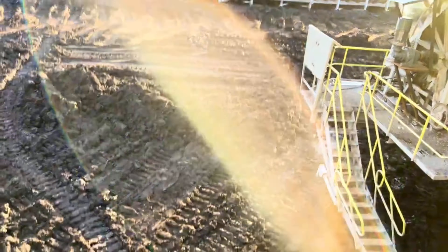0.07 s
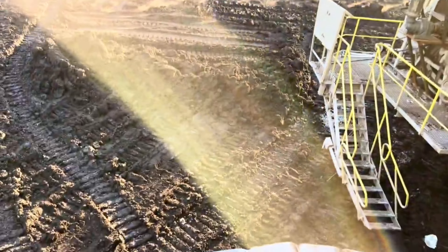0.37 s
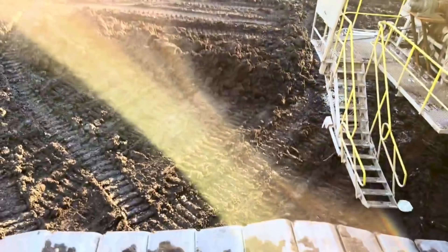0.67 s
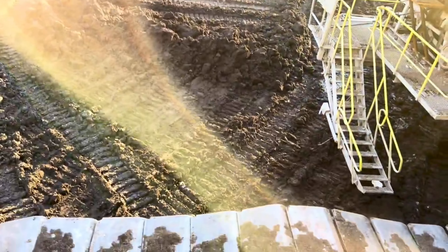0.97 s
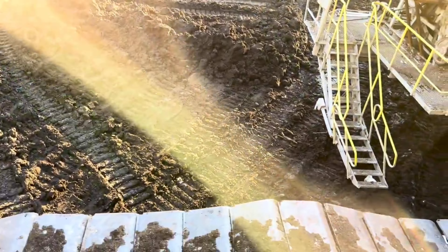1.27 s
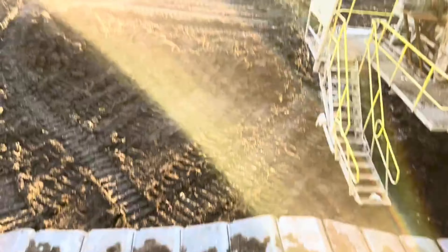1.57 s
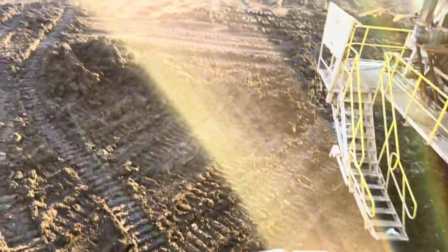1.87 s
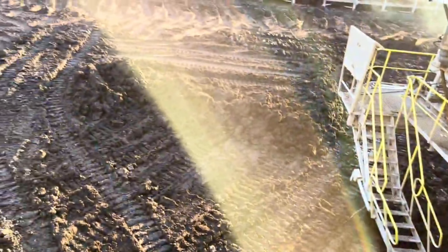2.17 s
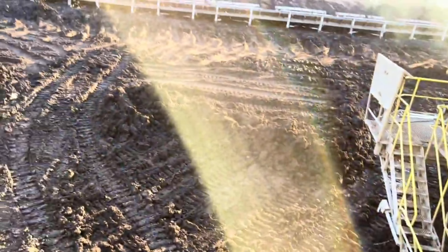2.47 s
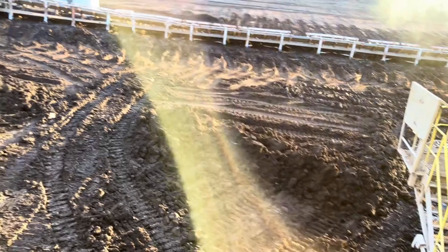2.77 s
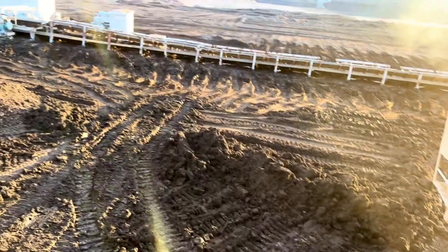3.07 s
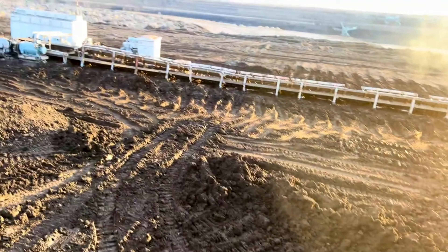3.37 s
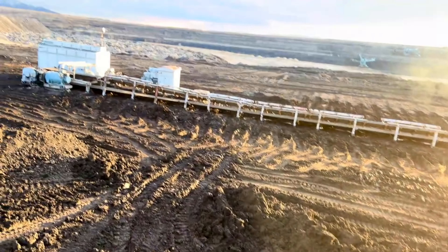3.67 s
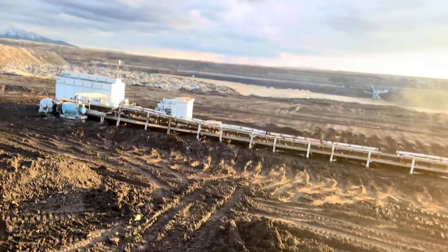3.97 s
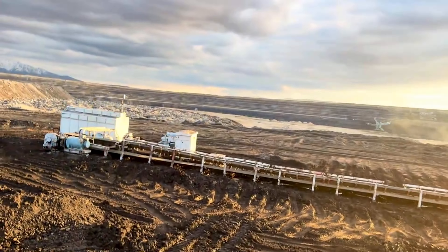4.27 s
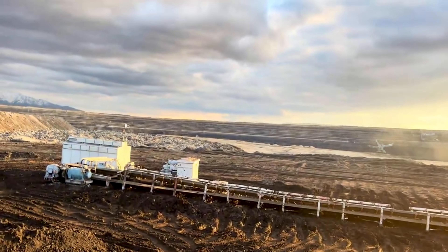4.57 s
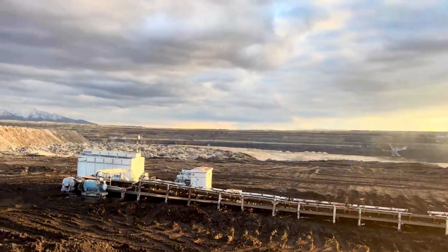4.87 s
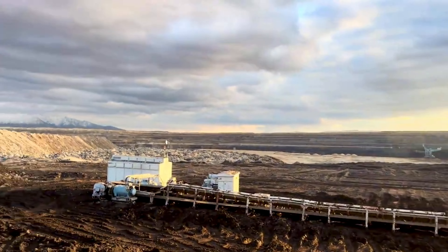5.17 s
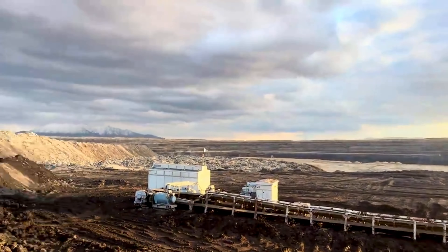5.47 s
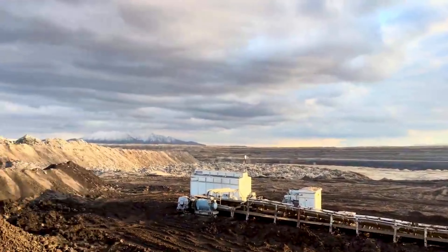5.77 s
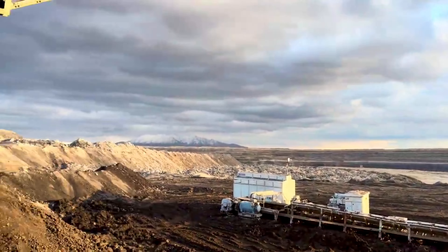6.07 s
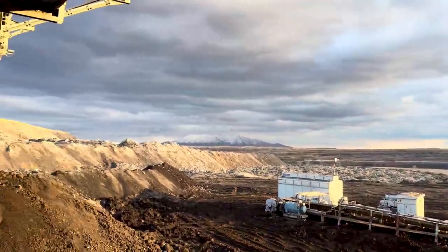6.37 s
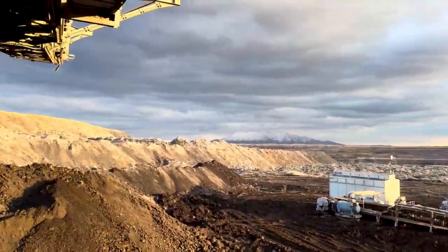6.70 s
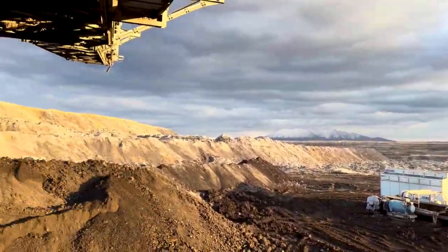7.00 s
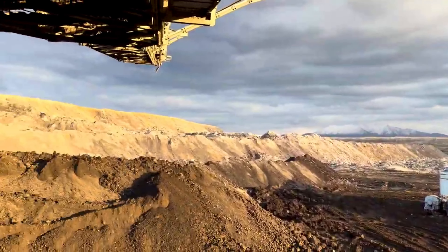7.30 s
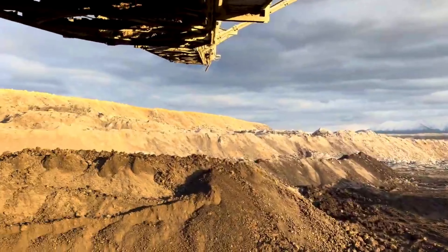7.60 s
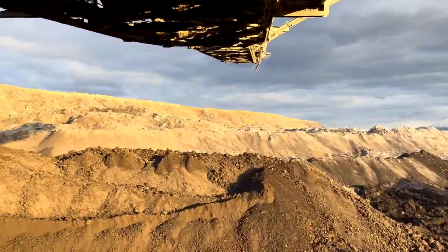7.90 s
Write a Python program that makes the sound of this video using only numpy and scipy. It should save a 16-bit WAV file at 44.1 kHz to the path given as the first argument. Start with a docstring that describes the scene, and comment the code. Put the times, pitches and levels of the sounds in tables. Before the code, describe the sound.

Dry conveyor rollers give small, high chirps outdoors while a bulldozer's chugging diesel climbs in pitch and its tracks knock and clank several times. The engine settles into a steady, clattering drone with an airy turbo whistle, above low track grinding and occasional thuds. The microphone turns slowly across the pit, and soil hissing off a conveyor belt swells towards the end, with a few more short squeals.

```python
"""A bulldozer's six-cylinder diesel revs up in an open pit while dry conveyor rollers chirp and squeal.
Within a second its turbocharger starts whistling up with it; the tracks rumble and knock, the hull booms.
From about 3.4 s the engine drones at full speed under load and the tracks grind harder.
Meanwhile the microphone turns slowly, through the beam of the intake near 5 s,
towards a hiss of running belts and sliding soil that is loudest at the end."""
import sys
import numpy as np
from scipy.fft import rfft, irfft, next_fast_len
from scipy.io import wavfile
from scipy.ndimage import uniform_filter1d, map_coordinates

SR = 44100
rng = np.random.default_rng(int(sys.argv[2]) if len(sys.argv) > 2 else 0)


def output_pcm(signal):
    """Save a mono or channel-first signal as 16-bit PCM at the path in sys.argv[1].

    Samples are clipped to [-1, 1] before scaling.
    """
    pcm = np.clip(np.atleast_2d(signal).T, -1, 1) * 32767
    wavfile.write(sys.argv[1], SR, np.round(pcm).astype(np.int16))


N = 354652
T = np.arange(N) / SR
ENGINE_LEAD_MS = 0.26  # the bulldozer reaches the right ear first
# the six firings of one engine cycle: (strength [ratio])
CYLINDERS = [0.62, 0.56, 1, 0.34, .4, 0.26]


def amp(db):
    """Decibels to gain."""
    return 10 ** (np.asarray(db) / 20)


def unit(x):
    """Scale to rms 1."""
    return x / np.sqrt(np.mean(x ** 2) + 1e-20)


def along(points, hz):
    """Read (frequency, value) points on a log axis."""
    f, v = np.transpose(points)
    return np.interp(np.log(hz + 1), np.log(f + 1), v)


def curve(points):
    """Join (time, value) points into one value a sample."""
    return np.interp(T, *np.transpose(points))


def between(ends, share):
    """From the first value to the second as share goes from 0 to 1."""
    return ends[0] + share * (ends[1] - ends[0])


def swell(middle_s, half_s):
    """A smooth rise to 1 and fall."""
    return np.exp(-((T - middle_s) / half_s) ** 2 / 2)


def held(middle_s, half_s):
    """A quick rise to 1, a hold and a quick fall."""
    return np.exp(-((T - middle_s) / half_s) ** 4 / 2)


def wobble(rate):
    """A smooth random curve, rate knots a second."""
    return map_coordinates(rng.standard_normal(int(N * rate / SR) + 4), [T * rate])


def turns(hz):
    """Cycles gone by at a moving frequency."""
    return np.cumsum(hz * np.ones(N)) / SR


def filtered(x, response):
    """Filter x with a gain that depends on frequency."""
    size = next_fast_len(N + 8192)
    return irfft(rfft(x, size) * response(np.fft.rfftfreq(size, 1 / SR)), size)[..., :N]


def coloured(x, spectrum):
    """Equalise x along (frequency [Hz], gain [dB]) points."""
    return filtered(x, lambda hz: amp(along(spectrum, hz)))


def placed(x, lead_ms):
    """A source off to the right reaches that ear earlier."""
    lead = lead_ms * SR / 1000
    return np.array([map_coordinates(x, [np.arange(N) + side * lead], order=3, mode="mirror")
                     for side in (-.5, .5)])


def diffuse(spectrum, channels=2):
    """Coloured noise of rms 1, unrelated between channels."""
    return unit(coloured(rng.standard_normal((channels, N)), spectrum))


def noise(spectrum):
    """Stereo noise: a direct part from the bulldozer's side, and scatter from all round."""
    # sound that arrives directly: (frequency [Hz], share of power [ratio])
    direct_share = [(60, 0.88), (130, 0.68), (280, 0.89), (600, 0.48), (1400, 0.51), (3000, 0.23),
                    (7000, 0.031), (11000, 0.18)]
    direct, *scatter = diffuse(spectrum, channels=3)
    direct = filtered(direct, lambda hz: np.sqrt(along(direct_share, hz)))
    scatter = filtered(np.array(scatter), lambda hz: np.sqrt(1 - along(direct_share, hz)))
    return placed(direct, ENGINE_LEAD_MS) + scatter


def fuzzy(hz, width_hz):
    """A tone of rms 1 whose strength and phase drift, smearing it into a narrow band."""
    a, b = filtered(rng.standard_normal((2, N)), lambda f: 1 / (1 + (2 * f / width_hz) ** 2))
    phase = 2 * np.pi * turns(hz)
    return unit(a * np.cos(phase) + b * np.sin(phase))


def ringing(modes, age):
    """Damped modes, a little different at every blow."""
    return sum(amp(db + rng.normal(0, 3.54) - 60 * age / t60)
               * np.sin(2 * np.pi * (hz * age + rng.random())) for hz, db, t60 in modes)


def belt():
    """Soil hisses unevenly off the belt; as the microphone turns, the hiss shifts and swishes rise."""
    # colour of the hiss, with a treble gap near 8 kHz that is not the soil's own:
    # (frequency [Hz], level [dB])
    hiss_colour = [(40, -90), (400, -9), (900, 11.5), (1500, 9), (2400, 1), (3200, 3.5), (4200, -2),
                   (5200, 2), (6500, -5), (8000, -19), (9200, -2), (10500, -32), (12000, -68)]
    # build of the hiss: (time [s], level [dB])
    hiss_level = [(0, -54), (3, -46.5), (5.3, -47.5), (6, -43.5), (7.3, -43), (7.75, -35.5), (8.04, -38.5)]
    # its head start at the right ear: (time [s], lead [ms])
    hiss_lead = [(5.5, .48), (6.5, .46), (7.2, .44), (8.04, .385)]
    # swishes: (middle [s], half length [s], pitch [Hz], rise [octaves/s], width [Hz], level [dB])
    swishes = [(5.5, .45, 3900, .21, 400, -51), (5.45, .4, 4600, .22, 420, -52),
               (6.3, .3, 3600, .25, 550, -56), (6.3, .35, 6300, .1, 700, -59),
               (6.45, .15, 1950, .4, 400, -54), (7, .25, 2450, .45, 420, -49.5),
               (7, .33, 4250, .35, 440, -50.5), (7.3, .2, 6750, .2, 700, -55),
               (7.77, .22, 5050, .24, 750, -50)]
    flow_db = 0.93 * wobble(11) + 1.6 * wobble(30)  # surges and lumps
    direct, *scatter = diffuse(hiss_colour, channels=3)
    hiss = amp(curve(hiss_level)) * unit(placed(direct, curve(hiss_lead)) + amp(-4.5) * np.array(scatter))
    swish = np.zeros((2, N))
    for s, half, hz, rise, width_hz, db in swishes:
        centre_hz = hz * 2 ** (rise * (T - s))
        swish += amp(db) * swell(s, half) * np.array([fuzzy(centre_hz, width_hz) for ear in range(2)])
    scrape = amp(.7 * wobble(35))
    return amp(flow_db) * (hiss + swish * scrape)


def roller(turn):
    """A dry roller chatters and chirps on two close modes; its rubbing fades as the microphone turns."""
    # roller resonances: (pitch [Hz], width [Hz], level [dB])
    modes = [(2760, 46, 8), (2822, 44, 6.5)]
    # chirps that leap out of the chatter: (time [s], level [dB])
    chirps = [(.11, -48), (.262, -49), (.31, -47), (.41, -46), (.64, -50), (.68, -50), (.95, -47),
              (1.068, -40), (1.16, -57), (1.62, -48), (1.84, -48), (1.91, -46), (2.048, -43), (2.305, -53),
              (2.56, -44), (2.74, -45), (2.833, -42.5), (2.916, -50), (3.16, -48), (3.3, -43.5),
              (3.46, -44), (3.57, -44), (3.74, -48), (3.96, -45), (4.115, -50), (4.34, -46), (4.6, -45.5),
              (4.767, -48)]
    rub = amp(-53 - 4 * turn + 5 * np.tanh(wobble(34)))
    chatter = [sum(amp(db) * fuzzy(hz, width) for hz, width, db in modes) for ear in range(2)]
    ring = [sum(amp(db) * np.sin(2 * np.pi * turns(hz + width / 2 * wobble(60)))
                for hz, width, db in modes) for ear in range(2)]
    chirp_level = sum(amp(db) * swell(s, half_s=0.017) for s, db in chirps)
    return rub * unit(np.array(chatter)) + chirp_level * unit(np.array(ring))


def squeals():
    """Short squeals near 3.5 kHz and a faint thin whistle near 7.3 kHz tremble in pitch and level."""
    # squeals and whistle: (middle [s], half length [s], pitch [Hz], level [dB], relative octave [dB])
    notes = [(.32, .016, 3490, -50, -6), (1, .18, 7270, -68, -30), (1.617, .031, 3490, -45, -11),
             (1.772, .02, 3497, -43, -19), (1.875, .068, 3505, -48.5, -5.5), (2.03, .024, 3487, -44, -14),
             (2.157, .014, 3470, -51, -18), (2.3, .4, 7320, -68, -30), (6.022, .011, 3485, -47, -19),
             (6.087, .027, 3485, -39, -20), (6.15, .022, 3485, -46, -19), (6.803, .025, 3490, -43.5, -12),
             (7.478, .027, 3520, -44, -24), (7.555, .033, 3495, -42, -18)]
    waver_hz, rough_db = 8, 3
    waver = turns(waver_hz * wobble(260))
    tones = np.zeros(N)
    for s, half, hz, db, octave_db in notes:
        phase = 2 * np.pi * (hz * T + waver)
        tones += amp(db) * swell(s, half) * (np.sin(phase) + amp(octave_db) * np.sin(2 * phase))
    pan_right = amp([[-2.5], [.5]])
    return tones * amp(rough_db * wobble(78)) * pan_right


def tracks(speed):
    """Links rumble over soft ground and grind harder as the engine speeds up."""
    # dull rumble of the links: (frequency [Hz], level [dB])
    rumble_colour = [(20, -87), (90, -43), (180, -1.5), (270, -1), (380, -3.5), (450, -13), (600, -24),
                     (1200, -61), (6000, -120)]
    # their midrange grind: (frequency [Hz], level [dB])
    grind_colour = [(60, -89), (300, -8), (480, 2), (560, 4), (700, -14.5), (1000, -48), (5000, -120)]
    rumble = amp(between((-33.5, -35.5), speed) + 0.17 * wobble(7.7)) * noise(rumble_colour)
    grind = amp(between((-55, -41.5), speed) + 1.2 * wobble(13)) * noise(grind_colour)
    return rumble + grind


def clacks():
    """Track pins snap against their links."""
    # small steel snaps: (time [s], level [dB])
    snaps = [(2.023, -34.5), (2.109, -34), (2.181, -33)]
    # colour of a pin: (frequency [Hz], level [dB])
    pin_colour = [(300, -50), (900, -4), (1350, 5), (1650, -5), (2100, -8), (2800, -22), (6000, -52)]
    attack_s, t60_s = 0.0017, 0.11
    level = np.zeros(N)
    for s, db in snaps:
        age = np.maximum(T - s, 0)
        level += (1 - np.exp(-age / attack_s)) * amp(db - 60 * age / t60_s)
    return level * diffuse(pin_colour)


def booms():
    """The heavy hull booms briefly as it rocks over the ground."""
    # deep hull notes: (time [s], pitch [Hz], level [dB])
    notes = [(1.565, 55.8, -18), (2.22, 51.6, -16), (3.605, 118, -19), (5.39, 71.8, -14), (6.66, 69.5, -23),
             (7.43, 62, -19), (7.97, 60.5, -20)]
    hull = sum(amp(db) * swell(s, half_s=0.029) * np.sin(2 * np.pi * (hz * T + rng.random()))
               for s, hz, db in notes)
    return placed(hull, ENGINE_LEAD_MS)


def knocks():
    """A link drops: the frame and the shoe ring, the ground thuds and loose parts rattle."""
    # link drops: (time [s], attack [s], thud [dB], body [dB], clank [dB])
    drops = [(.035, 0.017, -50, -47, -34), (.24, 0.011, -52, -35, -33.5), (.528, 0.0056, -30, -35, -53),
             (1.497, 0.0048, -21, -9, -33), (1.732, 0.0062, -17.5, -15, -46), (2.02, 0.0044, -25, -18, -39),
             (2.111, 0.0039, -22, -15, -22.5), (2.182, 0.0043, -29, -18.5, -30.5),
             (2.494, 0.0021, -18, -26, -52), (4.288, 0.0027, -11, -22, -54), (5.35, 0.0077, -10, -9.5, -38),
             (5.385, 0.008, -25, -27, -40), (5.429, 0.0044, -14, -20, -35), (7.35, 0.0091, -22, -9.5, -39),
             (7.425, 0.0046, -21, -33, -46), (7.944, 0.0038, -9.5, -40, -52)]
    # ring of the steel frame: (pitch [Hz], level [dB], t60 [s])
    frame_modes = [(65, -5, 0.49), (108, 0, 0.2), (256.3, -1, 0.13), (297, -11.5, 0.36), (473, -12, 0.18),
                   (595, -15.5, 0.17), (747, -18, 0.14)]
    # ring of a track shoe: (pitch [Hz], level [dB], t60 [s])
    shoe_modes = [(634, -6.5, 0.41), (880, -6.5, 0.22), (1190, -15, 0.11)]
    # thud of the ground: (frequency [Hz], level [dB])
    thud_colour = [(20, -50), (60, 9), (110, 34.5), (170, 26.5), (300, -37), (1500, -120)]
    # low rattle of the body: (frequency [Hz], level [dB])
    body_colour = [(20, -90), (100, -11), (200, 0.5), (275, 1.5), (400, -3.5), (520, -6), (700, -18),
                   (1200, -29), (5000, -120)]
    # clank of loose parts: (frequency [Hz], level [dB])
    clank_colour = [(40, -120), (400, -14), (680, 12), (1000, 1), (1800, -12), (2800, -40), (7000, -57),
                    (14000, -120)]
    thud_t60_s, body_t60_s, clank_t60_s = 0.14, 0.29, 0.15
    ring, thud, body, clank = np.zeros((4, N))
    for s, attack_s, thud_db, body_db, clank_db in drops:
        near = (T > s) & (T < s + .5)
        age = T[near] - s
        blow = (1 - np.exp(-age / attack_s)) ** 2
        thud[near] += blow * amp(thud_db - 60 * age / thud_t60_s)
        body[near] += blow * amp(body_db - 60 * age / body_t60_s)
        clank[near] += blow * amp(clank_db - 60 * age / clank_t60_s)
        ring[near] += blow * amp(body_db - 3.5) * ringing(frame_modes, age)
        ring[near] += blow * amp(clank_db) * ringing(shoe_modes, age)
    rattle = amp(-6.5) * body * noise(body_colour) + clank * noise(clank_colour)
    return placed(ring, ENGINE_LEAD_MS) + thud * noise(thud_colour) + rattle


def whine(hz, clean_db, width_hz):
    """Meshing gears: a clean tone from the engine with a rough part scattered round it."""
    clean = placed(np.sin(2 * np.pi * turns(hz)), ENGINE_LEAD_MS)
    rough = np.array([fuzzy(hz, width_hz) for ear in range(2)])
    return unit(amp(clean_db) * clean + rough)


def gears(firing_hz, speed):
    """The timing gears whine up with the engine, and their casing rings in swells."""
    # casing resonances: (middle [s], half length [s], pitch [Hz], level [dB], clean over rough [dB])
    resonances = [(0.29, .07, 975, -43.5, -4), (.64, .1, 1072, -46, -5), (1.14, .2, 1112, -46.5, -5),
                  (1.73, .14, 1224, -41.5, -3), (7.18, .48, 1620, -42.5, 5)]
    mesh = amp(between((-53, -56.5), speed)) * whine(18.25 * firing_hz, clean_db=-13, width_hz=28)
    casing = sum(amp(db) * held(s, half) * whine(hz, clean_db, width_hz=22)
                 for s, half, hz, db, clean_db in resonances)
    return mesh + casing


def turbocharger(firing_hz, speed, beam):
    """The turbocharger spools up into a breathy whistle whose pitch follows the engine."""
    on_s, spool_s = 0.78, 0.27
    spool = (1 + np.tanh((T - on_s) / spool_s)) / 2
    level_db = between((-68, -59.5), speed) + 6.5 * beam + 1.5 * wobble(8.3)
    return spool * amp(level_db) * fuzzy(146.2 * firing_hz, width_hz=540)


def throb(firing_hz, depth):
    """One swell per firing, each cylinder at its own strength."""
    firings = turns(firing_hz)
    strength = np.asarray(CYLINDERS)[firings.astype(int) % len(CYLINDERS)]
    return unit(1 + depth * strength * np.sin(np.pi * firings) ** 2)


def intake(firing_hz, speed, beam):
    """Air rushes into the engine, pulsing with the cylinders."""
    # bright rush, with a treble gap near 8.5 kHz that is not the air's own: (frequency [Hz], level [dB])
    rush_colour = [(200, -84), (2000, -7), (5000, -6.5), (7000, 13.5), (8500, -8), (10000, 10.5),
                   (12500, 8), (13600, 7.5), (14500, -5)]
    level_db = between((-64, -55), speed) + 1.5 * beam + 1.8 * wobble(7.1)
    return amp(level_db) * noise(rush_colour) * throb(firing_hz, depth=0.66)


def combustion(firing_hz, speed, turn):
    """Combustion clatters at each firing, louder with speed and as the microphone turns."""
    # hard diesel clatter: (frequency [Hz], level [dB])
    clatter_colour = [(40, -98), (350, -3), (650, -1), (830, 4.5), (930, -1), (1100, 3), (1500, -6),
                      (2200, -8.5), (3200, -14), (4600, -14.5), (5800, -22.5), (7500, -49), (14000, -78)]
    level_db = between((-44.5, -40), speed) + 4.5 * turn + 1.06 * wobble(12)
    return amp(level_db) * noise(clatter_colour) * throb(firing_hz, depth=0.43)


def growl(cycles, count=110, size=4096):
    """The ragged pressure wave of one engine cycle repeats; the body colours its many overtones."""
    # body colour: (frequency [Hz], level per overtone [dB])
    overtone_colour = [(180, -46.5), (240, -48), (330, -50.5), (420, -54), (560, -53), (700, -66.5),
                       (830, -63.5), (1100, -79), (1400, -77)]
    strengths = (np.arange(count) > 12) * amp(2.5 * rng.standard_normal(count))
    phases = np.exp(2j * np.pi * rng.random(count))
    wave = irfft(strengths * phases, size) * size / np.sqrt(2)
    return coloured(np.interp(cycles % 1 * size, np.arange(size), wave), overtone_colour)


def chug(firing_hz, speed):
    """The firing tone, its octave, and tones of the uneven cylinders that crest together in a chug."""
    # firing tone: (time [s], level [dB])
    tone_level = [(0, -20.5), (.28, -17.5), (.44, -22.5), (.52, -16), (.62, -26), (.7, -17), (1.1, -20),
                  (1.48, -19), (1.7, -32.5), (2, -18), (2.3, -20), (2.6, -15), (3.05, -23), (3.35, -20),
                  (3.9, -22), (5, -27.5), (5.65, -23), (7.1, -30.5), (8.04, -31)]
    # its octave, booming in the exhaust pipe: (time [s], level [dB])
    octave_level = [(0.1, -28), (.4, -50), (1.25, -43), (1.5, -29), (1.8, -31), (2.05, -54), (2.4, -39),
                    (2.9, -26), (3.3, -35.5), (3.7, -49), (5.1, -47), (5.4, -45), (8.04, -36)]
    # uneven-cylinder tones: (order [x cycle rate], level when slow [dB], level at full speed [dB])
    orders = [(3, -42, -35), (4, -36.5, -31), (5, -34, -42), (7, -38, -41), (8, -38, -42), (9, -35.5, -32),
              (10, -35, -46), (11, -40, -46), (13, -44, -45.5), (14, -46, -45), (16, -50, -47),
              (18, -51, -47.5), (20, -50, -51), (22, -44, -48.5), (24, -46, -50.5), (26, -43.5, -54),
              (37, -60, -55)]
    # higher tones that swell a while: (middle [s], half length [s], order [x cycle rate], level [dB])
    drones = [(4.75, .45, 22, -43), (5.15, .45, 24, -44), (5.95, .3, 22, -46)]
    smear_s = between((.005, .0009), speed)  # the crests line up more tightly at speed
    firings = turns(firing_hz)
    cycles = firings / len(CYLINDERS)
    tones = amp(curve(tone_level) + .8 * wobble(8.3)) * unit(np.cos(2 * np.pi * firings))
    tones += amp(curve(octave_level) + 0.51 * wobble(2.1)) * unit(np.sin(2 * np.pi * 2 * firings))
    for order, *ends_db in orders:
        level_db = between(ends_db, speed) + 1.9 * wobble(8)
        late_cycles = rng.normal() * smear_s * firing_hz / len(CYLINDERS)
        tones += amp(level_db) * unit(np.cos(2 * np.pi * order * (cycles - late_cycles)))
    for s, half, order, db in drones:
        tones += amp(db) * held(s, half) * unit(np.sin(2 * np.pi * order * cycles))
    return placed(tones, ENGINE_LEAD_MS)


def exhaust(firing_hz, speed):
    """The exhaust rasps and puffs out gas, both harder while the engine accelerates."""
    # deep puffs of gas: (frequency [Hz], level [dB])
    puff_colour = [(15, -52), (30, -6), (42, -4), (60, 0), (110, 0.5), (160, -9), (230, -9.5), (400, -75),
                   (1500, -120)]
    cycles = turns(firing_hz) / len(CYLINDERS)
    acceleration = uniform_filter1d(np.gradient(firing_hz) * SR, size=SR // 4)  # Hz a second
    rasp = np.array([growl(cycles + .003 * wobble(14)) for ear in range(2)])
    rasp *= amp(between((-15, 1), speed) + 0.144 * acceleration)
    puffs_db = between((-37.5, -28), speed) + 0.3826 * acceleration + 2.0 * wobble(6.3)
    puffs = amp(puffs_db) * noise(puff_colour) * throb(firing_hz, depth=0.58)
    return rasp + puffs


def scene():
    """The bulldozer works in front of the conveyor while the microphone turns."""
    # the engine revving up: (time [s], firing rate [Hz])
    revs = [(0, 51), (.45, 57.3), (.8, 59.8), (1, 60.8), (1.3, 61.2), (1.5, 64.2), (1.72, 68.4),
            (2.5, 77.9), (3, 85.7), (3.4, 89.3), (6.5, 89.1), (7.3, 88.2), (8.04, 89.5)]
    firing_hz = curve(revs)
    speed = (firing_hz - firing_hz.min()) / np.ptp(firing_hz)  # 0 slow, 1 full
    turn = np.interp(T, [2.63, T[-1]], [0, 1])  # the microphone turns at an even pace
    beam = swell(middle_s=5.1, half_s=0.99)  # it passes through the beam of the intake
    engine = chug(firing_hz, speed) + exhaust(firing_hz, speed) + combustion(firing_hz, speed, turn)
    engine += intake(firing_hz, speed, beam) + gears(firing_hz, speed)
    engine += turbocharger(firing_hz, speed, beam)
    undercarriage = tracks(speed) + knocks() + booms() + clacks()
    background = roller(turn) + squeals() + belt()
    return background + undercarriage + engine


def record(dry):
    """The microphone pair widens the midrange, favours the left and cuts the deepest bass and the top."""
    # stereo width: (frequency [Hz], side gain [dB])
    width = [(60, 1), (250, -2.5), (500, 2.5), (1000, 2), (2000, 0), (8000, -1)]
    # balance: (frequency [Hz], left minus right [dB])
    tilt = [(60, 1), (110, 2), (200, 4), (370, 2), (680, 1.5), (1240, 0.5), (2270, -0.5), (4150, 5),
            (7600, -1.5), (13900, 0.0)]
    fade_s, low_hz, top_hz = .006, 29.5, 14300
    left, right = dry * np.minimum(1, np.minimum(T, T[-1] - T) / fade_s)
    mid = (left + right) / 2
    side = coloured((left - right) / 2, width)
    pair = np.array([mid + side, mid - side])
    pair = filtered(pair, lambda hz: amp(np.outer([.5, -.5], along(tilt, hz))))
    return filtered(pair, lambda hz: (hz < top_hz) * (1 - 1 / (1 + (hz / low_hz) ** 6)))


dry = scene()
out = record(dry)
output_pcm(out)
```